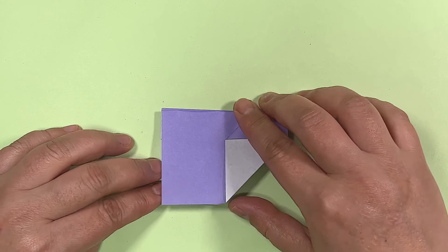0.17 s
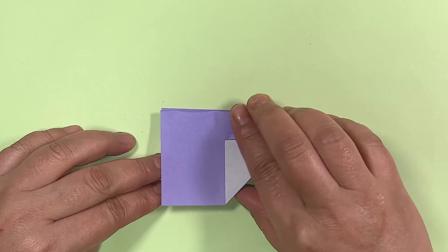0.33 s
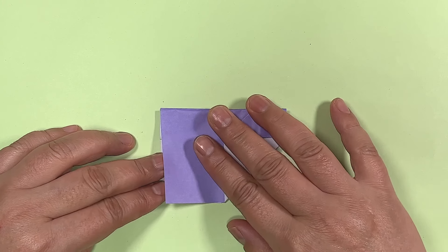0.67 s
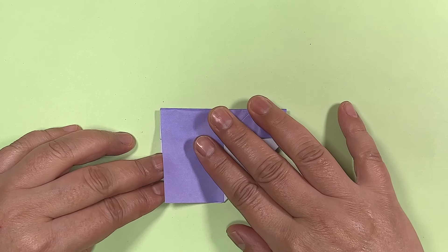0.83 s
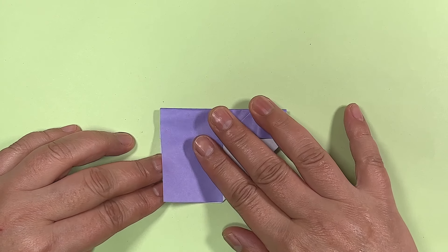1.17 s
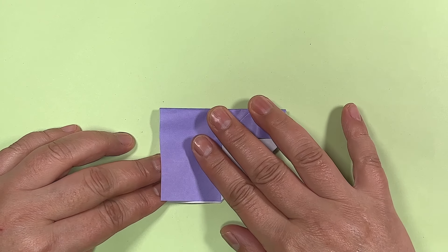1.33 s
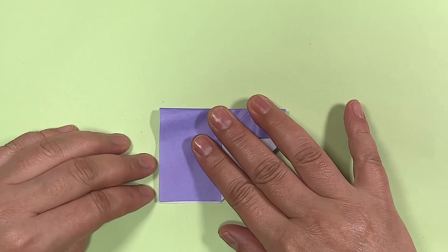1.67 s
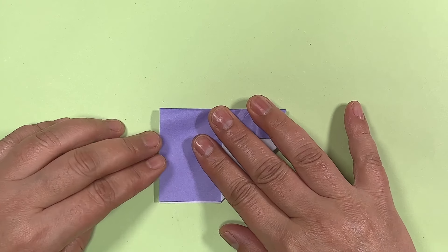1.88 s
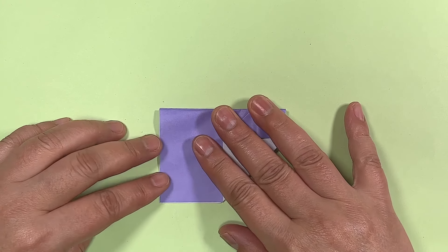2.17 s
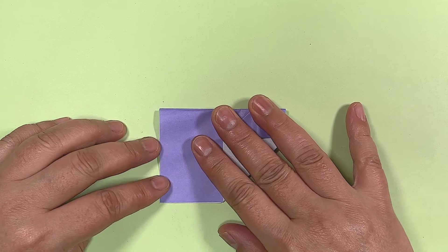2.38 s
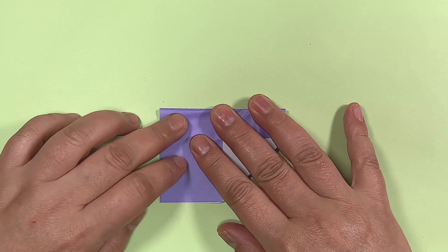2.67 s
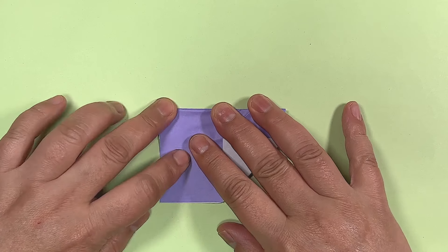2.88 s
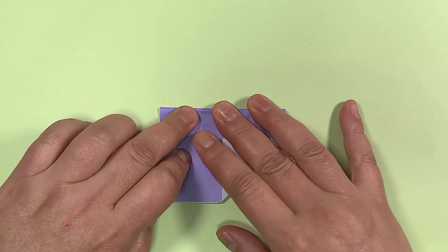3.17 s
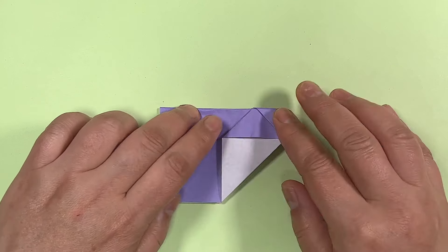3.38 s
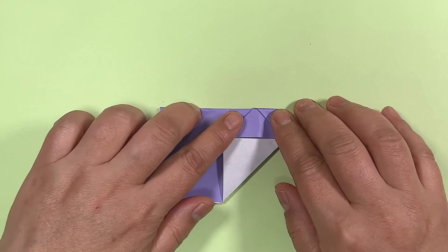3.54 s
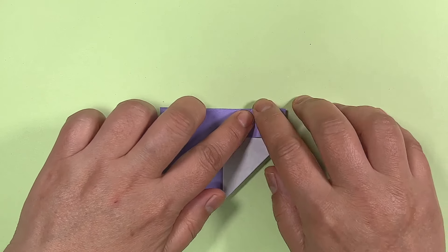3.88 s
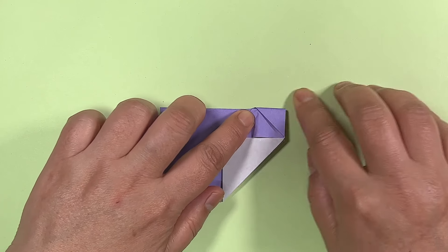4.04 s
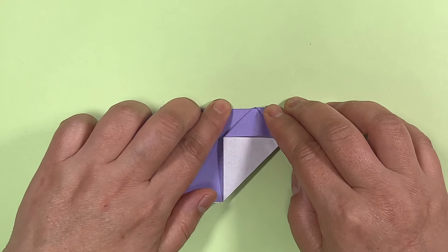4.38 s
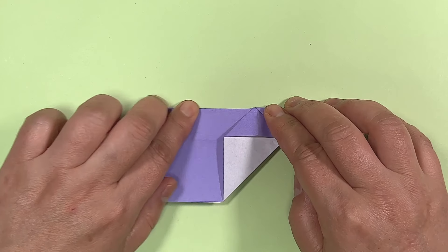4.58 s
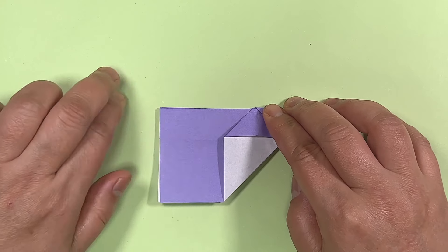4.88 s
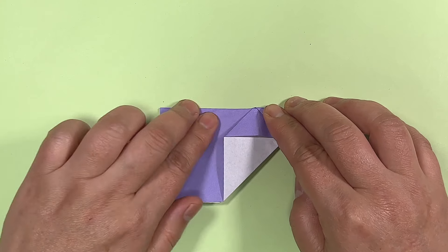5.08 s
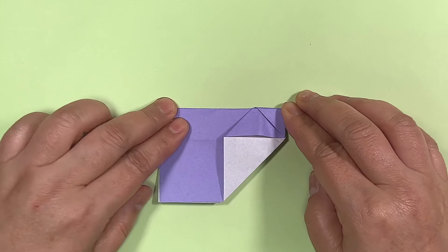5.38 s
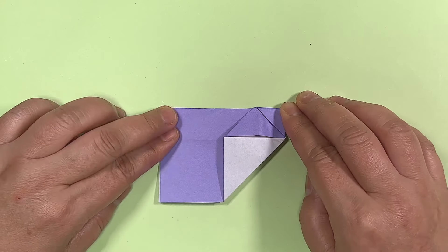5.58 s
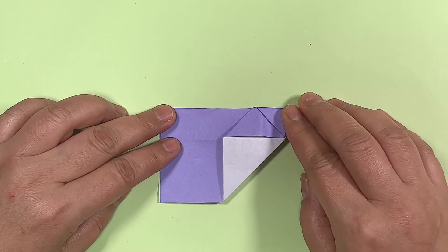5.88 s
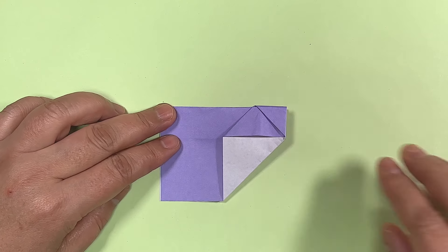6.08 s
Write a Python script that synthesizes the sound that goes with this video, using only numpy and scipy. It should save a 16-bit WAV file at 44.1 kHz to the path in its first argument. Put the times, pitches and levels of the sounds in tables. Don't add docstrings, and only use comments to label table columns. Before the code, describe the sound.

Fingers fold and press a small paper sheet on a wooden table, with crisp cracks, soft sliding hisses and light knocks over faint room hum.

```python
import sys
import numpy as np
from scipy import signal
from scipy.fft import rfft, irfft
from scipy.io import wavfile
from scipy.ndimage import uniform_filter1d

SR = 44100
rng = np.random.default_rng(int(sys.argv[2]) if len(sys.argv) > 2 else 0)


def attenuation_scalar(level_db):
    decades = np.asarray(level_db, float) / 20
    return 10 ** decades


def output_pcm(signal):
    pcm = np.clip(np.atleast_2d(signal).T, -1, 1) * 32767
    wavfile.write(sys.argv[1], SR, np.round(pcm).astype(np.int16))


N = 274302

# frequency in Hz, level in dB.
ROOM_COLOUR = [(15, -45), (25, -24.5), (80, -1.5), (141, -7), (242, -13.5), (317, -5), (394, -10.5),
               (439, -7), (591, -11), (1330, -16), (1440, -32), (2000, -14), (2840, -20.5), (10100, -25),
               (16000, -27.5)]
# time in seconds, level in dB.
HUM_LEVEL = [(0.0, -60), (1.11, -65.5), (1.45, -63), (2.04, -68.5), (2.2, -74), (2.82, -76), (3.12, -67),
             (3.74, -69.5), (4.02, -63.5), (4.26, -61), (5.06, -62), (5.47, -59.5), (5.89, -59.5),
             (6.22, -61)]

# frequency in Hz, level in dB.
HISS_COLOUR = [(4500, -16), (6000, -10), (7400, -2.5), (8700, -3.5), (10300, -6), (11500, -11.5),
               (14000, -18), (17000, -40)]
SHEEN_COLOUR = [(7000, -53), (9000, -2), (10400, 3.5), (11800, -3), (13000, -3.5), (15000, -17.5),
                (17000, -15)]
RASP_COLOUR = [(1200, -17), (2100, -6), (2800, -5), (3700, -3), (4350, -2), (4900, -6.5), (6200, -9),
               (8000, -25)]
DRAG_COLOUR = [(120, -5.5), (300, -2.5), (700, -6.5), (1300, -8), (2200, -11), (3500, -46)]
# time in seconds, level in dB.
LEAN_LEVEL = [(0, -61), (1, -71.5), (1.5, -65), (2.4, -66.5), (3.3, -64.5), (3.8, -61.5), (4.3, -64.5),
              (4.65, -56), (4.85, -71.5), (5.15, -57), (5.45, -67), (5.75, -58.5), (6.22, -64)]
# fastest moment in seconds, build-up in seconds, fading in seconds,
# hiss in dB, pressure in dB.
GLIDES = [(.045, 0.047, 0.042, -50, -1.5), (.456, 0.2, 0.36, -52, -2.5), (.66, 0.33, 0.23, -61, 1),
          (1.55, 0.19, 0.23, -59.5, -8), (1.626, 0.086, 0.078, -53.5, -3.5), (1.82, 0.44, 0.15, -74.5, 6.5),
          (2.49, 0.064, 0.27, -59.5, -1), (2.61, 0.14, 0.23, -52.5, -4.5), (2.742, 0.24, 0.038, -56, -11),
          (2.78, .1, 0.055, -66, -1), (2.928, .03, 0.09, -56.5, -9), (3.539, 0.28, 0.65, -63, 0),
          (3.734, 0.11, 0.16, -56, -4), (3.965, 0.076, 0.089, -45.5, -11), (4.19, 0.17, 0.072, -66, -3),
          (4.692, 0.017, 0.014, -40.5, -15), (4.78, 0.16, 0.02, -77, -9), (4.996, 0.021, 0.013, -53, 4),
          (4.96, .025, 0.092, -61.5, -6), (5.415, 0.56, 0.33, -57, -2.5), (5.655, 0.12, 0.25, -61.5, -2.5),
          (5.86, 0.23, 0.39, -63.5, 3.5)]
# fastest moment in seconds, build-up in seconds, fading in seconds,
# hiss in dB, pressure in dB.
SCRAPES = [(.187, 0.12, 0.15, -60, 4.5), (.297, 0.099, 0.1, -57.5, 0), (.397, 0.051, 0.19, -56, -12),
           (.888, 0.13, 0.39, -67.5, 0.8), (1.135, 0.021, 0.083, -57.5, 3), (1.18, 0.046, 0.069, -56, 5),
           (3.038, 0.023, 0.18, -59, -0.5), (3.178, 0.075, 0.12, -52.5, -18),
           (3.821, 0.078, 0.047, -59.5, -3.5), (4.213, 0.12, 0.056, -59.5, -3),
           (4.318, 0.077, 0.07, -49.5, -2), (4.44, .045, 0.61, -58, -10), (5.246, 0.054, 0.043, -51, -5.5)]
# lift in seconds, build-up in seconds,
# time from fastest moment to lift in seconds, hiss in dB, pressure in dB.
SKIMS = [
    (3.4, .1, 0.084, -60, -5.5),
    (4.064, 0.097, 0.11, -58.5, -1),
    (4.801, 0.069, 0.28, -54.5, -4),
    (5.17, 0.032, 0.093, -54, -8.5),
    (6.028, 0.09, 0.068, -54.5, -3.5),
]

# frequency in Hz, level in dB.
CRISP_COLOUR = [(3300, -16.5), (4400, -0.5), (5300, -15.5), (6400, 1.5), (7500, -2), (10300, -3.5),
                (12000, -12), (16000, -30)]
# start in seconds, flap in dB, ring of the flap in Hz,
# crisp part in dB, broad part in dB.
CRACKS = [(0.0468, -59, 4000, -31, -52), (0.0741, -42, 2060, -41, -42.5), (0.2969, -39, 3120, -26.5, -40.5),
          (1.1266, -19, 6300, -15, -41), (1.1402, -25, 6100, -30, -56), (1.1624, -10, 6300, -9.5, -42),
          (1.1666, -32, 2600, -38, -30), (1.1758, -25, 6100, -30, -48), (1.6261, -36.5, 2410, -26, -40),
          (2.9175, -49, 3800, -39, -56), (3.03, -38, 2200, -30, -42), (3.0672, -46, 2930, -33, -60),
          (3.126, -35, 2220, -25, -47), (3.1308, -14, 3100, -14, -25.5), (3.1675, -15.5, 2900, -26, -48),
          (3.1692, -18, 2120, -12.5, -43), (3.1802, -46, 2890, -44, -58),
          (3.186, -18.5, 3480, -16.5, -27.5), (3.9309, -49, 1550, -28.5, -37.5),
          (4.3083, -54, 2410, -16.5, -52), (4.689, -38.5, 1490, -38.5, -40), (5.002, -37, 2840, -31, -44),
          (5.1926, -50, 2250, -23.5, -40), (5.3468, -30, 2990, -26, -36)]
# start in seconds, flap in dB, ring of the flap in Hz, broad part in dB.
POPS = [(0.385, -23, 2130, -55), (0.3976, -32, 2070, -50), (0.607, -41, 4300, -52),
        (0.6723, -31, 2480, -36), (0.6866, -63, 1950, -44), (1.1275, -14.5, 4600, -45),
        (1.128, -27, 2240, -27.5), (1.163, -15.5, 2720, -54), (2.9683, -25.5, 2020, -30),
        (3.207, -19.5, 2280, -41), (3.7997, -54, 2050, -58), (3.832, -38.5, 2030, -45),
        (4.0501, -43, 2180, -62), (4.204, -36, 2520, -43), (4.2406, -36.5, 1720, -40),
        (4.313, -14, 3040, -24.5), (4.337, -35, 1950, -49), (4.409, -44, 1590, -53),
        (4.4319, -28, 990, -35.5), (4.8, -54, 3860, -57), (4.9934, -53, 2290, -36.5),
        (5.024, -31.5, 2180, -34), (5.1568, -48, 2050, -39.5), (5.374, -36, 1430, -59),
        (5.6357, -47, 2270, -45.5), (6.073, -43.5, 1880, -48.5)]

# start in seconds, hard edge in dB, deep thud in dB, body in dB.
KNOCKS = [(0.075, -57, -62, -50), (0.136, -59, -55, -47), (0.408, -43, -58, -44.5), (0.686, -49, -66, -52),
          (3.043, -51, -37, -48.5), (3.171, -37.5, -42, -34.5), (3.419, -49.5, -63, -49),
          (3.57, -53, -72, -55), (3.644, -37.5, -71, -39.5), (3.869, -45.5, -51, -45),
          (3.93, -30.5, -45, -39.5), (3.966, -35.5, -45.5, -39), (3.984, -45.5, -46, -52.5),
          (4.409, -44.5, -47, -46), (4.433, -29.5, -56, -28.5), (4.938, -59, -55, -58),
          (4.994, -47, -44.5, -44.5), (5.081, -39.5, -51, -42), (5.157, -26, -42, -30.5),
          (5.193, -20.5, -39.5, -30), (5.219, -45, -50, -42), (5.261, -55, -46, -38),
          (5.296, -51, -52, -52), (5.504, -57, -57, -54), (5.619, -50, -73, -45.5), (5.635, -50, -73, -51),
          (6.072, -54, -64, -53)]
# frequency in Hz, level in dB, time to fall by 60 dB in seconds.
DEEP_TONES = [(89.5, 7, 0.64), (101, 10.5, 0.78), (76, 1, 0.53), (203, -17, 0.79)]
BODY_TONES = [(305, -8.5, 0.7), (386, 4, 0.18), (469.3, 4.5, 0.15), (523, -4, 0.2), (247, -15, 0.42)]
EDGE_TONES = [(694, 9, 0.17), (747, 6.5, 0.19), (907, 15.5, 0.057), (1158, 1, 0.22), (1426, -2, 0.32)]
BELLY_TONES = [(195, -2.5, 0.38), (211.4, -6.5, 0.195)]

JOLT_SAMPLES = 44


def evened(x):
    return x / np.sqrt(np.mean(x ** 2) + 1e-20)


def peaked(x):
    return x / (abs(x).max() + 1e-20)


def coloured(x, points):
    hz, db = np.transpose(points)
    bins = np.fft.rfftfreq(len(x), 1 / SR) + 1
    gain_db = np.interp(np.log(bins), np.log(hz), db)
    return irfft(rfft(x) * attenuation_scalar(gain_db), len(x))


def band(x, lo_hz, hi_hz, order=2):
    return signal.sosfilt(signal.butter(order, [lo_hz, hi_hz], "band", fs=SR, output="sos"), x)


def drift(rate_hz):
    z = rfft(rng.standard_normal(N))
    slow = np.exp(-(np.fft.rfftfreq(N, 1 / SR) / rate_hz) ** 2)
    return evened(irfft(z * slow, N))


def level_along(table):
    s, db = np.transpose(table)
    return np.interp(np.arange(N) / SR, s, db)


def add(mix, s, sound):
    part = mix[round(s * SR):][:len(sound)]
    part += sound[:len(part)]


def room_air():
    return attenuation_scalar(-61.5) * evened(coloured(rng.standard_normal(N), ROOM_COLOUR))


def hum():
    t = np.arange(N) / SR
    turns = np.cumsum(90.1 + 1.07 * drift(rate_hz=2.95)) / SR
    low = attenuation_scalar(level_along(HUM_LEVEL) + 1.6 * drift(rate_hz=1.3)) * np.sin(2 * np.pi * turns)
    whine = attenuation_scalar(-73.5 + 1.5 * drift(rate_hz=3.0)) * np.sin(2 * np.pi * 450 * t)
    return np.sqrt(2) * (low + whine)


def strokes(table, fade_db=-24, bend=1.07, lift_db_per_s=0, sheen_hold=1):
    t = np.arange(0, N + 64, 64) / SR
    s, rise, fall, hiss_db, press_db = np.transpose(table)[:, :, None]
    before = t < s
    away = np.where(before, (s - t) / np.maximum(rise, 0.005), (t - s) / np.maximum(fall, 0.005))
    touch_db = hiss_db + lift_db_per_s * np.maximum(t - s - fall, 0)
    loss_db = fade_db * away ** bend
    hiss = touch_db + loss_db
    sheen = touch_db + loss_db * np.where(before, 1, sheen_hold)
    rasp = hiss + press_db
    return [np.interp(np.arange(N) / SR, t, (attenuation_scalar(db) ** 2).sum(0)) for db in (hiss, sheen, rasp)]


def skims():
    table = [(lift - to_lift, rise, to_lift, *levels) for lift, rise, to_lift, *levels in SKIMS]
    return strokes(table, fade_db=-9, bend=1.63, lift_db_per_s=-2500, sheen_hold=0.47)


def patchy(x, patch_db):
    z = signal.stft(x, nperseg=256)[2]
    field = uniform_filter1d(rng.standard_normal(z.shape), size=5, axis=0)
    field = uniform_filter1d(field, size=25, axis=1)
    return signal.istft(z * attenuation_scalar(patch_db * evened(field)), nperseg=256)[1][:N]


def slide():
    still_db = -77.5
    power = attenuation_scalar([still_db, still_db - 23, still_db + 1, -120])[:, None] ** 2 * np.ones(N)
    power[3] += attenuation_scalar(level_along(LEAN_LEVEL)) ** 2
    kinds = ((4, -9, strokes(GLIDES)), (-3, 0.5, strokes(SCRAPES)), (6, -6, skims()))
    for light_db, drag_db, (hiss, sheen, rasp) in kinds:
        power[0] += hiss * attenuation_scalar(-0.6 * light_db) ** 2
        power[1] += sheen * attenuation_scalar(2.93 * light_db - 19.5) ** 2
        power[2] += rasp
        power[3] += hiss * attenuation_scalar(drag_db) ** 2
    out = np.zeros(N)
    colours = (HISS_COLOUR, SHEEN_COLOUR, RASP_COLOUR, DRAG_COLOUR)
    for level, colour in zip(np.sqrt(power), colours):
        size_db = 1.85 * np.minimum(rng.exponential(1, N), 4)
        slips = rng.standard_normal(N) * attenuation_scalar(size_db) * (rng.random(N) < 0.3)
        flutter = attenuation_scalar(0.93 * drift(rate_hz=59))
        out += level * flutter * evened(coloured(slips, colour))
    return patchy(out, patch_db=1.58)


def snap(flap_db, flap_hz, crisp_db, broad_db, ms):
    grit = rng.standard_normal(6000)
    t = np.arange(len(grit)) / SR
    u = t / (ms * 0.0013)
    burst = (1 - np.exp(-u / 0.085)) ** 2 * np.exp(-(u / 0.35) ** 2.18)
    cracks = grit * abs(grit) ** 0.5 * burst
    jolt = 9 * (np.arange(len(grit)) == JOLT_SAMPLES)
    rustle = 0.051 * grit[::-1] * (1 - np.exp(-u / 0.7)) * attenuation_scalar(-60 * t / 0.12)
    flap = band(cracks + jolt + 0.34 * rustle, flap_hz * 0.9, flap_hz * 1.053, order=1)
    flap = band(flap, flap_hz * 0.35, flap_hz * 1.81)
    broad = band(cracks + jolt + 1.1 * rustle, 700, 2890)
    crisp = coloured(cracks + jolt / 2 + 3.3 * rustle, CRISP_COLOUR)
    crisp = crisp * (t > 0.0005) * np.clip((t[-1] - t) * 40 - 0.5, 0, 1)
    parts = ((flap_db - 5.5, flap), (broad_db + 4.5, broad), (crisp_db - 5, crisp))
    return sum(attenuation_scalar(db) * peaked(part) for db, part in parts)


def crack(flap_db, flap_hz, crisp_db, broad_db):
    ms = 11.9 + 0.18 * min(broad_db - crisp_db, 0)
    return snap(flap_db, flap_hz, crisp_db, broad_db, ms)


def pop(flap_db, flap_hz, broad_db):
    return snap(flap_db, flap_hz, -91, broad_db, ms=6.6)


def ring(tones, damping):
    t = np.arange(SR // 2) / SR
    waves = np.zeros(len(t))
    for hz, db, t60 in tones:
        spot_db = 2 * rng.standard_normal()
        spot_hz = hz * (1 + 0.025 * rng.standard_normal())
        waves += attenuation_scalar(db + spot_db - 60 * t * damping / t60) * np.sin(2 * np.pi * spot_hz * t)
    cycles = t * tones[0][0]
    push = 1 - np.exp(-4 * cycles)
    return peaked(waves * push * (1 + np.exp(-cycles / 6.2)))


def knock(edge_db, deep_db, body_db):
    damping = max(0.95 + 0.13 * (body_db + 49), 0.2)
    blow = attenuation_scalar(deep_db) * ring(DEEP_TONES, damping)
    blow += attenuation_scalar(body_db) * ring(BODY_TONES, damping)
    blow += attenuation_scalar(edge_db) * ring(EDGE_TONES, damping)
    blow += attenuation_scalar((deep_db + body_db) / 2 - 4.5) * ring(BELLY_TONES, damping)
    grit = rng.standard_normal(6000)
    t = np.arange(len(grit)) / SR
    rattle = peaked(band(grit * abs(grit) * attenuation_scalar(-60 * t * damping / 0.15), 366, 1130))
    blow[:len(grit)] += attenuation_scalar(edge_db - 10.5) * rattle
    return np.pad(band(blow, 78, 9000), (JOLT_SAMPLES, 0))


def reflections(x):
    t = np.arange(SR // 3) / SR
    taps = rng.choice([-1.0, 1.0], len(t)) * (rng.random(len(t)) < 0.05)
    taps = taps * attenuation_scalar(-60 * t / 0.18) * (t > 0.008)
    taps = band(taps, 130, 7400)
    return signal.oaconvolve(x, taps / np.linalg.norm(taps))[:N]


def scene():
    steady = room_air() + hum() + slide()
    hits = np.zeros(N)
    for table, source in ((CRACKS, crack), (POPS, pop), (KNOCKS, knock)):
        for s, *settings in table:
            add(hits, s, source(*settings))
    return (steady + hits + attenuation_scalar(-20.5) * reflections(hits))[None]


def band_limit(x):
    return signal.sosfilt(signal.butter(12, 16490, fs=SR, output="sos"), x)


def record(dry):
    thin = signal.sosfilt(signal.butter(2, 55, "high", fs=SR, output="sos"), dry)
    top_cut = signal.firwin(1023, 15760, window=("kaiser", 9), fs=SR)
    mix = signal.oaconvolve(thin, top_cut[None], "same")
    return band_limit(mix)


dry = scene()
out = record(dry)
output_pcm(out)
```